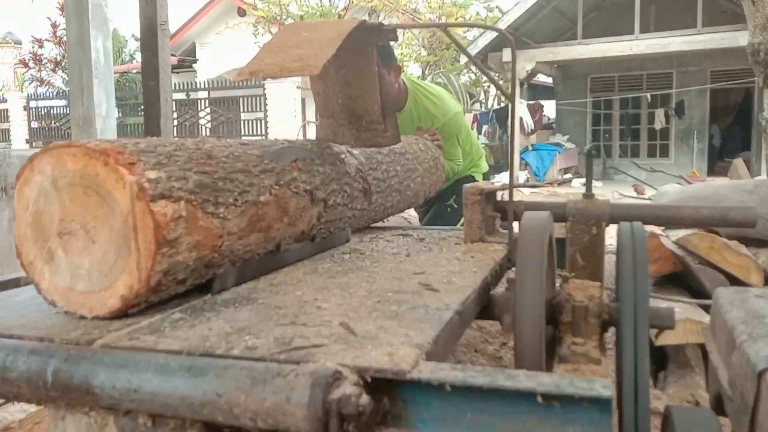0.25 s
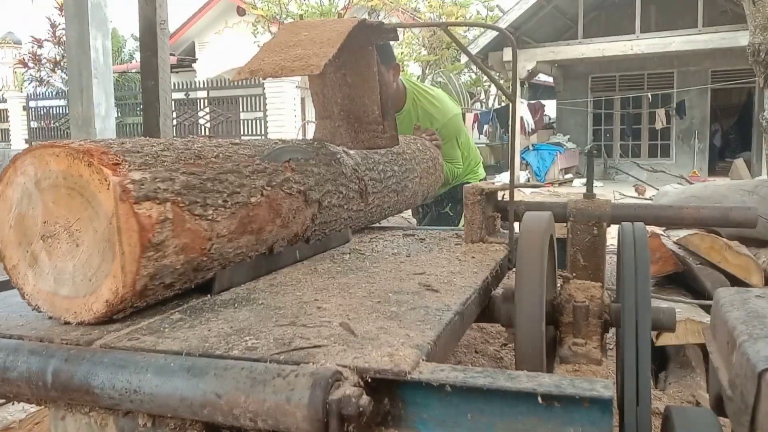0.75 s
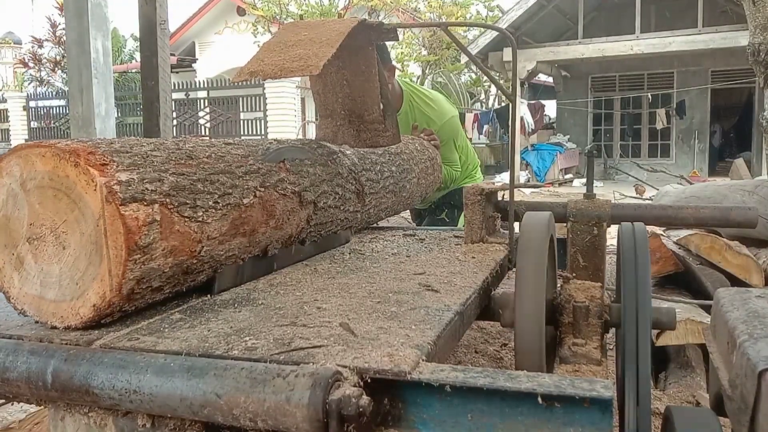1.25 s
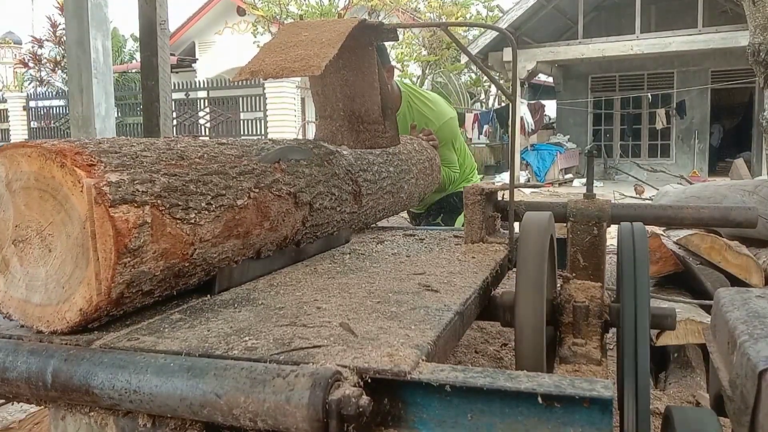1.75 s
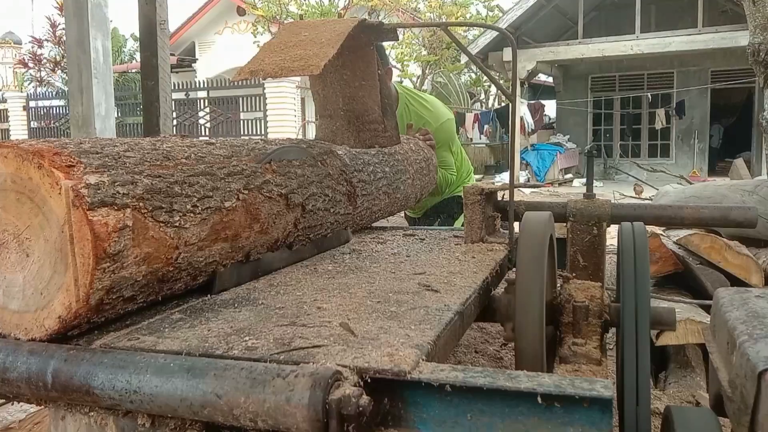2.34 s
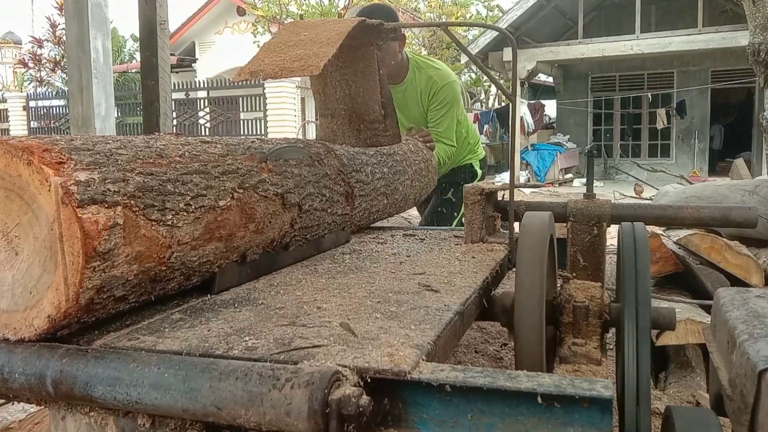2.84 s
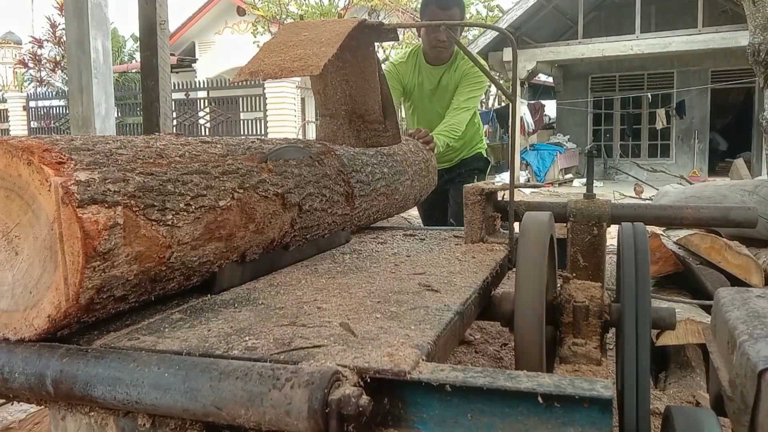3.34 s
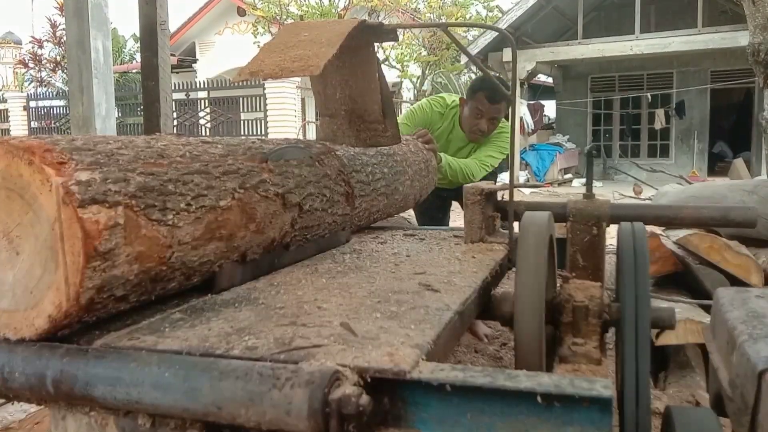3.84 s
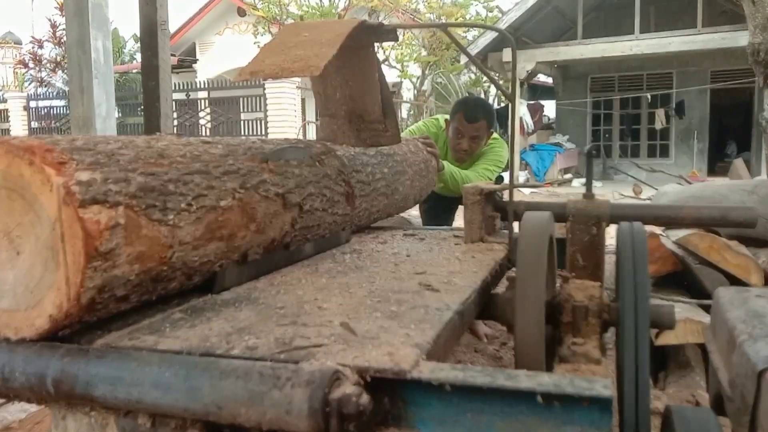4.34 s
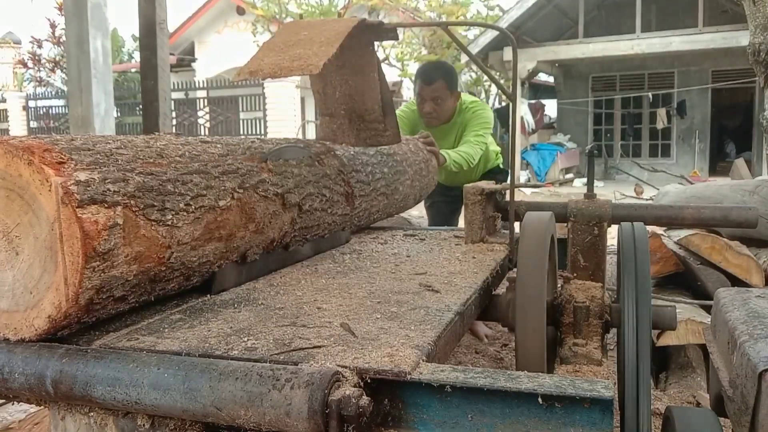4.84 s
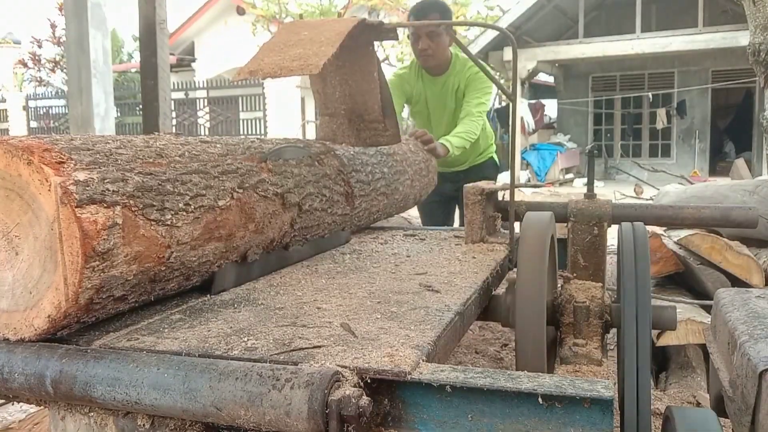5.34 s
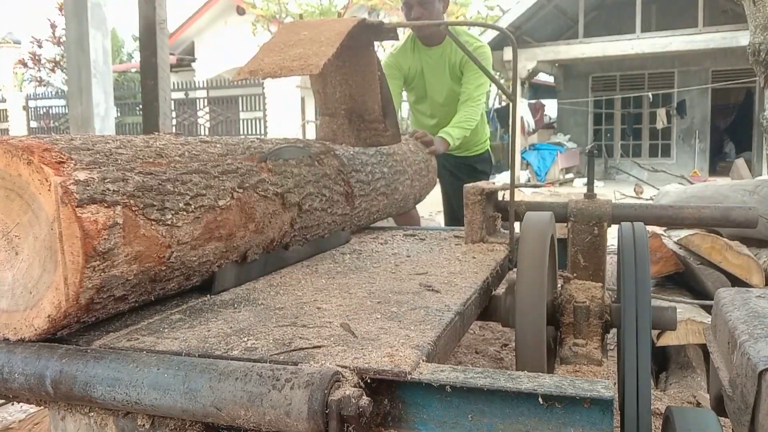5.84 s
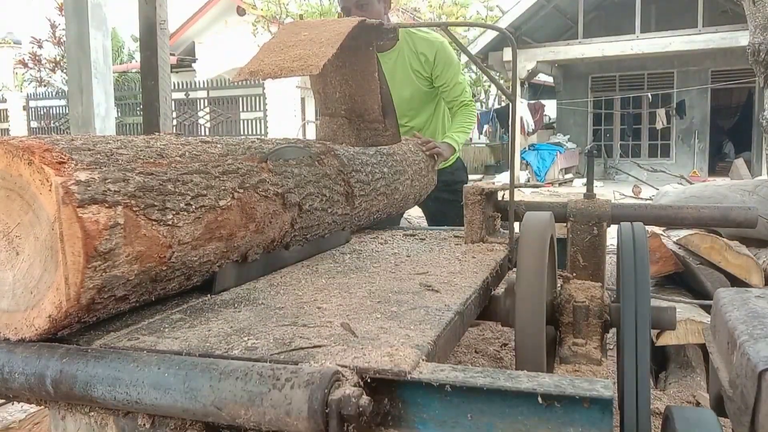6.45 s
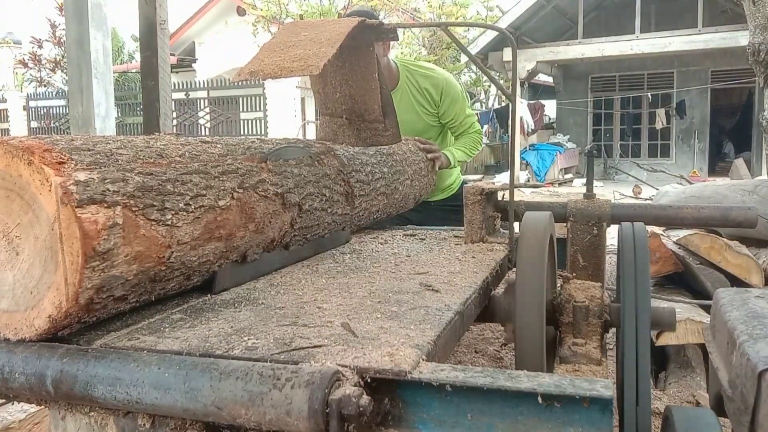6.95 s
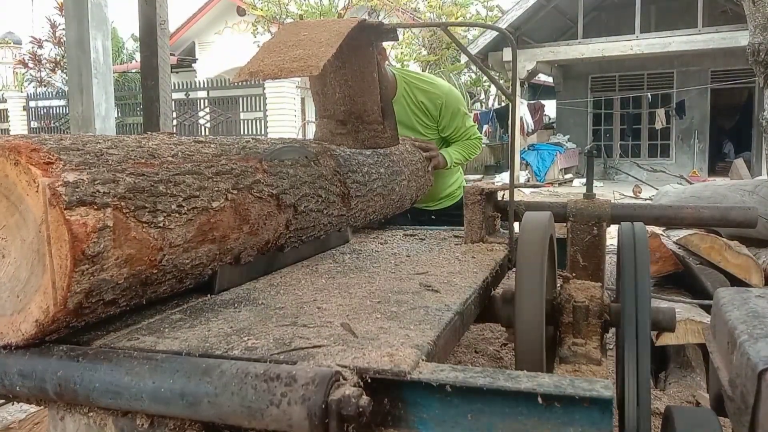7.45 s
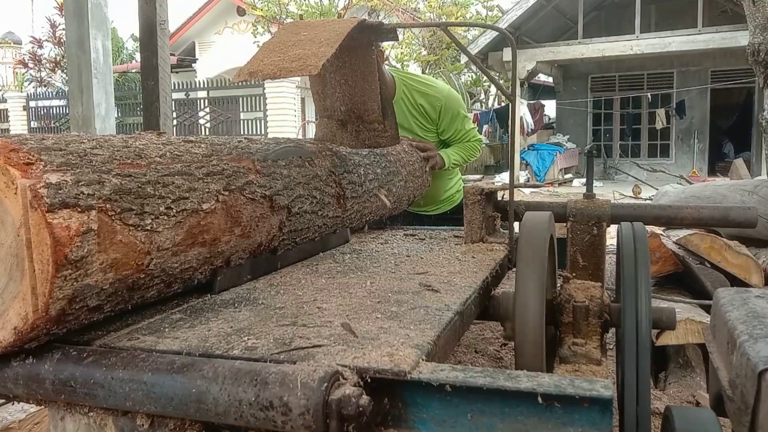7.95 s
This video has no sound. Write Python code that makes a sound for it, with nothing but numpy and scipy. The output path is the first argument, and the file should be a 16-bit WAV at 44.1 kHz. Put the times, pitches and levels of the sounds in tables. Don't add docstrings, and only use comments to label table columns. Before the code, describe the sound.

Sawmill yard: a clattering, hissing engine drives a big blade; one cut ends, it whirs free, and a new cut rasps near the end.

```python
import sys
import numpy as np
from scipy import signal
from scipy.fft import rfft, irfft, next_fast_len
from scipy.io import wavfile

SR = 44100
rng = np.random.default_rng(int(sys.argv[2]) if len(sys.argv) > 2 else 0)


def master_out(mix):
    frames = np.transpose(np.atleast_2d(mix))
    ceiling = np.clip(frames, -1, 1)
    pcm = np.round(ceiling * 32767).astype(np.int16)
    wavfile.write(sys.argv[1], SR, pcm)


def volts(x):
    e = np.asarray(x, float) / 20
    return 10 ** e


N = 362046

# f/Hz, width/Hz, level/dB
CASING_PANELS = [(322.4, 13, 5), (435.5, 5.9, 1), (539.6, 25, 7), (758, 9.7, -0.5), (995, 13, 3.5)]
RUB_FROM_S = 3.0


def rms_one(x):
    return x / np.sqrt(np.mean(x ** 2) + 1e-20)


def in_time(rows):
    s, *columns = np.transpose(rows)
    return [np.interp(np.arange(N) / SR, s, c) for c in columns]


def drift(rate):
    r = np.exp(-80 * np.pi * rate / SR)
    white = rng.standard_normal(N // 40 + 2002)
    slow = signal.lfilter([1], [1, -2 * r, r * r], white)[2000:]
    return np.interp(np.arange(N) / 40, np.arange(len(slow)), rms_one(slow))


def between(free_db, load_db, load):
    return free_db + load * (load_db - free_db)


def ring(clicks, hz, t60):
    r, w = volts(-60 / (t60 * SR)), 2 * np.pi * hz / SR
    soft = np.exp(-3 * hz / SR)
    clicks = clicks + 1e-18
    hard = signal.lfilter([0, np.sin(w)], [1, -2 * r * np.cos(w), r * r], clicks)
    onset = signal.lfilter([0, np.sin(w)], [1, -2 * r * soft * np.cos(w), (r * soft) ** 2], clicks)
    return hard - onset


def resonate(x, hz, width_hz):
    r, w = np.exp(-np.pi * width_hz / SR), 2 * np.pi * hz / SR
    return signal.lfilter([1, 0, -1], [1, -2 * r * np.cos(w), r * r], x)


def steep_mode(x, hz, width_hz):
    return rms_one(resonate(resonate(x, hz, width_hz), hz, width_hz))


def coloured_noise(spectrum, patchy_db, shared, rate, modes=()):
    out, together, white = 0, drift(rate), rng.standard_normal((2, N))
    edges = 200 * 2 ** np.arange(0, 6.6, .5)
    for k, (low, high) in enumerate(zip(edges, edges[1:])):
        band = signal.sosfilt(signal.butter(2, [low, high], "band", fs=SR, output="sos"), white[k % 2])
        out = out + band * volts(patchy_db * (shared * together + drift(rate)))
    out = out + signal.sosfilt(signal.butter(2, edges[0], fs=SR, output="sos"), white[1])
    size = next_fast_len(N)
    hz = np.fft.rfftfreq(size, 1 / SR) + 1
    spectrum_hz, spectrum_db = np.transpose(spectrum)
    colour_db = np.interp(np.log(hz), np.log(spectrum_hz), spectrum_db, left=-70)
    for mode_hz, width_hz, mode_db in modes:
        colour_db = colour_db + mode_db / (1 + (2 * (hz - mode_hz) / width_hz) ** 2)
    return rms_one(irfft(rfft(out, size) * volts(colour_db), size)[:N])


def once_a_cycle(cycles, share, spread_db):
    count = np.floor(cycles - share)
    passing = np.diff(count, prepend=count[0]) > 0
    strength = volts(spread_db * rng.standard_normal(128))
    return passing * strength[(count - count[0]).astype(int)]


def crank():
    # t/s, rate/(cycles/s)
    speed = [(0, 11.461), (1.1, 11.302), (1.8, 11.371), (2.75, 11.273), (3.15, 11.664), (4.4, 11.694),
             (5.3, 11.648), (6.6, 11.685), (7.22, 11.617), (7.8, 11.121), (8.21, 11.091)]
    return -.0642 + np.cumsum(in_time(speed)[0]) / SR


def engine_body(cycles, load):
    # f/Hz, density/(dB per Hz)
    clatter_colour = [(60, -17), (150, -26.5), (300, -14), (500, -11), (800, -6), (1000, -10.5),
                      (1100, -9.5), (1500, -10.5), (2600, -13.5), (3500, -19), (6000, -27.5), (8000, -38.5),
                      (15500, -36)]
    swing = np.cos(2 * np.pi * (cycles - .22))
    clatter = coloured_noise(clatter_colour, patchy_db=1.4, shared=0.35, rate=11.5, modes=CASING_PANELS)
    howl = steep_mode(rng.standard_normal(N), hz=1267, width_hz=124)
    howl_db = between(-25.5, -27.5, load) + 2.7 * swing + 1.3 * drift(7.5)
    return volts(-22 + 0.66 * swing) * clatter + volts(howl_db) * howl


def puffs(cycles, load):
    # share/cycle, timing spread/cycle, rise/cycle, fall/cycle, free level/dB, loaded level/dB
    leaks = [(0.191, 0.015, 0.0037, 0.046, -4.5, 3), (.31, 0.012, 0.025, 0.034, -2.5, -6.5),
             (.37, 0.0094, 0.021, 0.023, 4, 2), (.5, .01, 0.086, 0.15, -5, -6.5),
             (.725, 0.013, 0.0055, 0.036, -6, -6)]
    # f/Hz, density/(dB per Hz)
    hiss_colour = [(900, -2), (2000, -6), (3000, -14), (5000, -13), (6200, -18.5), (7000, -10.5),
                   (8200, -20.5), (10000, -17.5), (13900, -22), (14300, -24), (14600, -19), (15000, -21),
                   (16000, -22)]
    # f/Hz, width/Hz, level/dB
    manifold = [(2640, 200, 13), (3070, 80, 13.5), (3970, 130, 15), (4870, 150, 7), (6460, 190, 5.5)]
    steady_leak_db, puff_spread_db = -16, 1.0
    power = volts(2 * steady_leak_db) + np.zeros(N)
    for share, spread, rise, fall, free_db, load_db in leaks:
        cycle_number = np.floor(cycles - share + 2.5).astype(int)
        late, hard = rng.standard_normal((128, 2))[cycle_number].T
        since = (cycles - share + .5) % 1 - .5 - spread * late
        opening = np.exp(-.5 * (since / rise) ** 2)
        dying = np.exp(-np.abs(since) / fall)
        shape = np.where(since < 0, opening, dying)
        power += shape * volts(2 * (between(free_db, load_db, load) + puff_spread_db * hard))
    hiss = coloured_noise(hiss_colour, patchy_db=0.54, shared=0.38, rate=19.0, modes=manifold)
    return volts(-20.5) * np.sqrt(power) * hiss


def valve_gear(cycles, load):
    # f/Hz, t60/s, free level/dB, loaded level/dB
    knocks = [(1053, 0.014, -11.5, -12), (622, 0.044, -19, -28), (770, 0.0018, 5.5, 9),
              (500, 0.0047, -2.5, -4), (91.5, 0.067, -28.5, -24), (96, 0.035, -15.5, -37),
              (943, 0.0042, -0.5, -9.5), (1265, 0.034, -13, -17), (774, 0.021, -12.5, -13.5),
              (1120, 0.012, -18, -4), (529, 0.019, -17, -18), (1016, 0.027, -13, -32)]
    knock_shares = [.026, .057, .128, .176, .19, .43, .456, .729, .923, .934, .947, .987]
    contact_shares = [.07, .2, .56, .8, .94]
    scatter = .04
    out = np.zeros(N)
    for share, (hz, t60, free_db, load_db) in zip(knock_shares, knocks):
        clicks = once_a_cycle(cycles, share, spread_db=0.0)
        out += ring(clicks * volts(between(free_db, load_db, load)), hz, t60)
    for hz, width_hz, panel_db in CASING_PANELS:
        clicks = np.zeros(N)
        for share, (late, side) in zip(contact_shares, rng.random((5, 2))):
            clicks += np.sign(side - .5) * once_a_cycle(cycles, share + scatter * late, spread_db=0.0)
        out += volts(-30.0 + panel_db) * ring(clicks, hz, 0.77 / width_hz)
    return out


def exhaust(cycles, load):
    # share/cycle, push 1 or suck -1, bark f/Hz, bark t60/s, bark level/dB
    pulses = [(.127, 1, 365, .017, -6), (.443, -1, 378, .011, 2), (.729, 1, 360, .012, -4)]
    # boom lag/cycle, boom f/Hz, boom t60/s, boom level/dB
    pipes = [(0.061, 130, 0.019, -15.5), (0.047, 116, 0.027, -14), (-0.062, 166.6, 0.11, -14.5)]
    out = np.zeros(N)
    for (share, push, bark_hz, bark_t60, bark_db), (lag, boom_hz, boom_t60, boom_db) in zip(pulses, pipes):
        boom_clicks = once_a_cycle(cycles, share + lag, spread_db=3.34)
        bark_clicks = once_a_cycle(cycles, share, spread_db=0.7)
        out += push * volts(boom_db) * ring(boom_clicks, boom_hz, boom_t60)
        out += push * volts(bark_db) * ring(bark_clicks, bark_hz, bark_t60)
    return out * volts(-2.2 * load)


def feed():
    # contact t/s, time to full depth/s, clear of the teeth t/s, time to back out/s
    pushes = [
        (-1.5, 2.3, 2.96, .5),
        (7.165, .16, 9.5, .5),
    ]
    rasp_db = -18.5
    s = np.arange(N) / SR
    rub_db = -24 - 0.9 * np.maximum(s - RUB_FROM_S, 0)
    depth, since = np.zeros(N), np.zeros(N)
    for contact, dig, clear, back_out in pushes:
        depth = depth + np.clip(np.minimum((s - contact) / dig, (clear - s) / back_out), 0, 1)
        since = np.where(s > contact, s - contact, since)
    power = volts(2 * rub_db) * (1 - depth) + volts(2 * rasp_db) * depth
    return depth, 10 * np.log10(power), since


def engine_load(depth):
    lag_s, full_load = 0.13, 0.99
    keep = np.exp(-1 / (lag_s * SR))
    lagged = signal.lfilter([1 - keep], [1, -keep], depth, zi=[depth[0]])[0]
    return np.clip(full_load * lagged, 0, 1)


def wobble(cycles, load, since):
    # t/s, belt slip/turn, three-a-turn swing/dB
    belt = [(0, -.02, 4), (.5, -.03, 4), (1.5, -.067, 1.5), (2.5, -.052, 1.2), (3.5, .006, 2.4),
            (4.5, .034, 2.7), (6, .058, 1.8), (7.4, .061, .8), (8.21, .065, .8)]
    pulley_ratio = .84
    slip, thrice_db = in_time(belt)
    once_db = between(3.5, 0.9, load)
    lead = .1 + 0.23 * np.maximum(np.arange(N) / SR - RUB_FROM_S, 0)
    lead = between(lead, 2, load)
    angle = 2 * np.pi * (pulley_ratio * cycles + slip)
    bite_db = once_db * np.cos(angle + lead) + thrice_db * np.cos(3 * angle)
    first_bite_db = 1.0 * np.exp(-since / 1.2)
    return bite_db + first_bite_db * np.cos(angle + 2.3)


def blade(cycles, blade_db, load, since):
    # f/Hz, density/(dB per Hz)
    rasp_colour = [(1300, -23), (2000, -16.5), (2800, -7.5), (3800, -3), (5100, -0.5), (5700, -4.5),
                   (6200, -12.5), (6900, -10.5), (7600, -15), (8100, -21.5), (10000, -20), (13900, -38),
                   (14500, -18), (16000, -43)]
    # f/Hz, width/Hz, level under the rasp/dB
    plate_modes = [(3107, 22, -23), (3500, 38, -21.5), (3830, 160, -17.5), (4210, 29, -49),
                   (4175, 200, -15), (4540, 31, -18), (5040, 97, -14), (5130, 200, -21.5),
                   (5200, 96, -23.5), (5606, 160, -19.5)]
    streak_db, streaks_per_s, streak_load_db = 5., 12., 6.
    bite_db = wobble(cycles, load, since)
    rasp = coloured_noise(rasp_colour, patchy_db=1.43, shared=0.99, rate=80.0)
    teeth = rng.standard_normal(N)
    for hz, width_hz, mode_db in plate_modes:
        flare_db = streak_db * drift(streaks_per_s) + streak_load_db * load
        rasp = rasp + volts(mode_db - 4.5 + flare_db) * steep_mode(teeth, hz, width_hz)
    plate = signal.sosfiltfilt(signal.butter(3, 6300, fs=SR, output="sos"), rasp)
    return volts(blade_db) * (rasp + (volts(bite_db) - 1) * plate)


def scene():
    cycles = crank()
    depth, blade_db, since = feed()
    load = engine_load(depth)
    engine = engine_body(cycles, load) + puffs(cycles, load) + valve_gear(cycles, load) + exhaust(cycles, load)
    engine = engine - 0.28 * signal.lfilter(*signal.iirpeak(205, 4.0, fs=SR), engine)
    return (engine + blade(cycles, blade_db, load, since))[None]


def top_cut(x):
    return signal.sosfilt(signal.butter(12, 16750, fs=SR, output="sos"), x)


def record(dry):
    rounded = 1.077 * np.tanh(dry / 1.022)
    thin = signal.sosfilt(signal.butter(4, 72, "high", fs=SR, output="sos"), rounded)
    size = next_fast_len(N)
    spectrum = rfft(thin, size) * (np.fft.rfftfreq(size, 1 / SR) < 15520)
    mix = irfft(spectrum, size)[:, :N]
    return top_cut(mix)


dry = scene()
out = record(dry)
master_out(out)
```